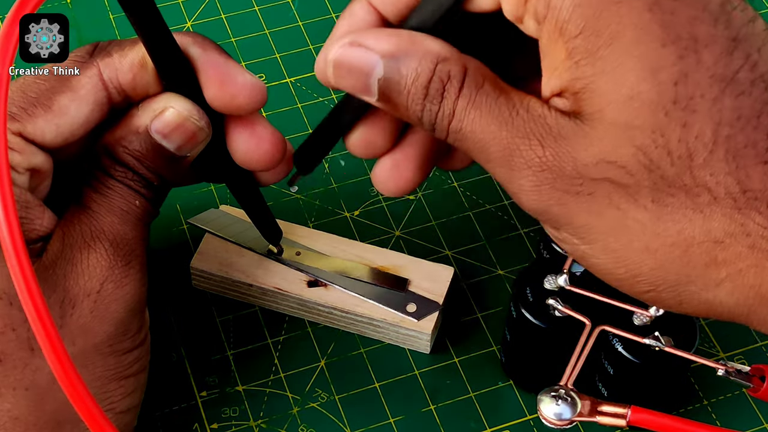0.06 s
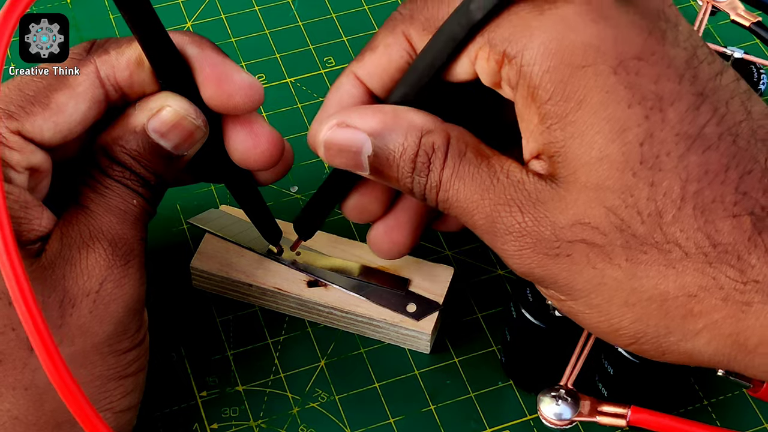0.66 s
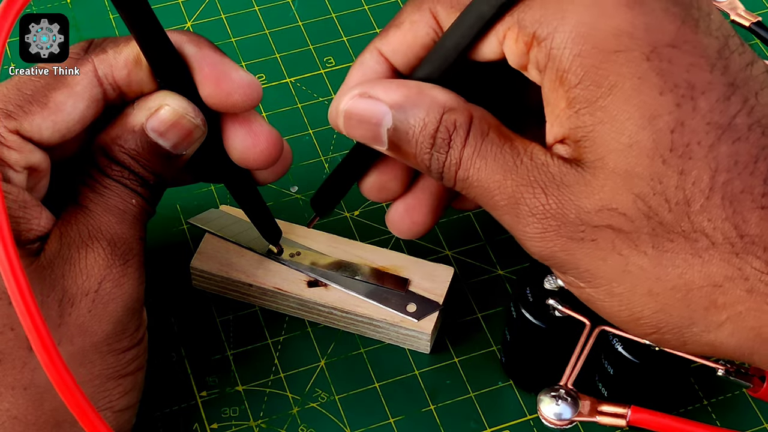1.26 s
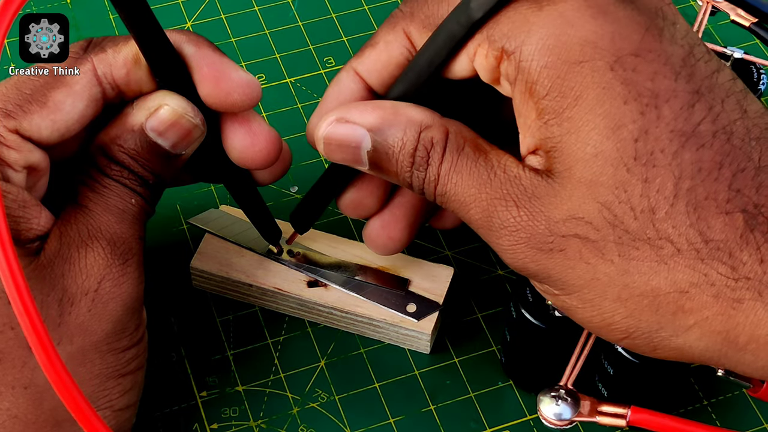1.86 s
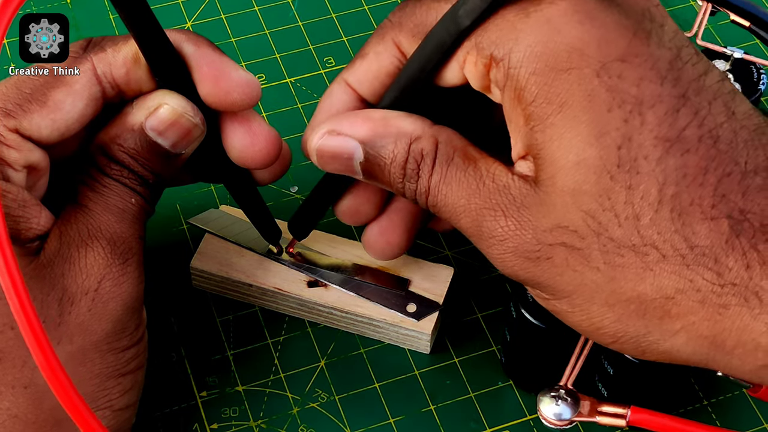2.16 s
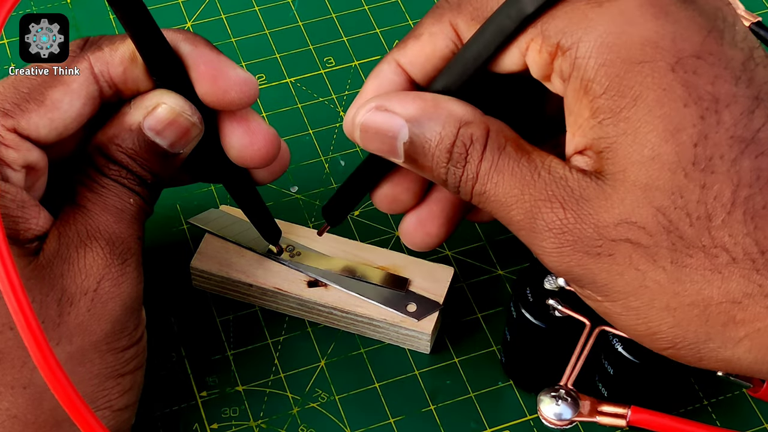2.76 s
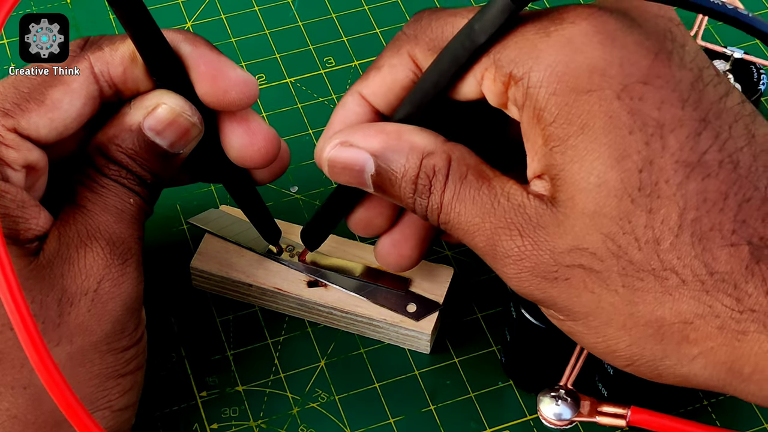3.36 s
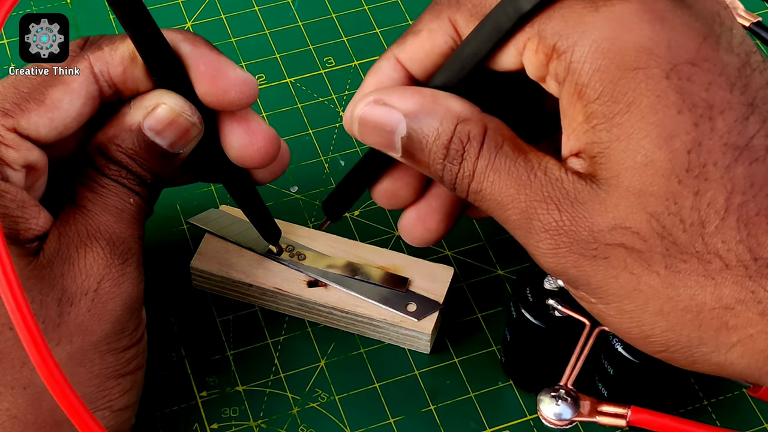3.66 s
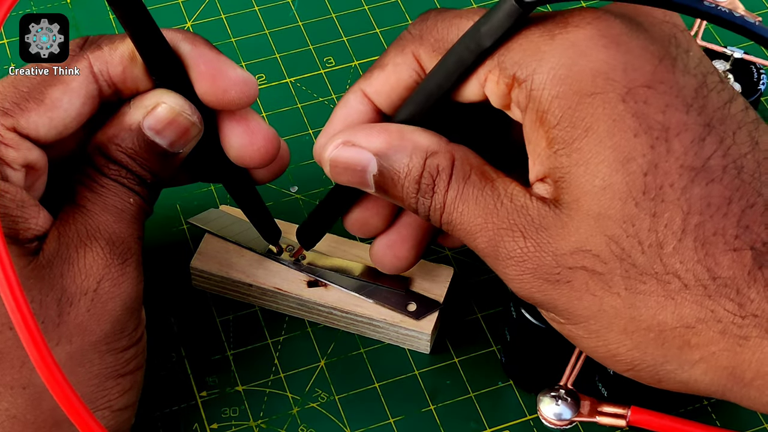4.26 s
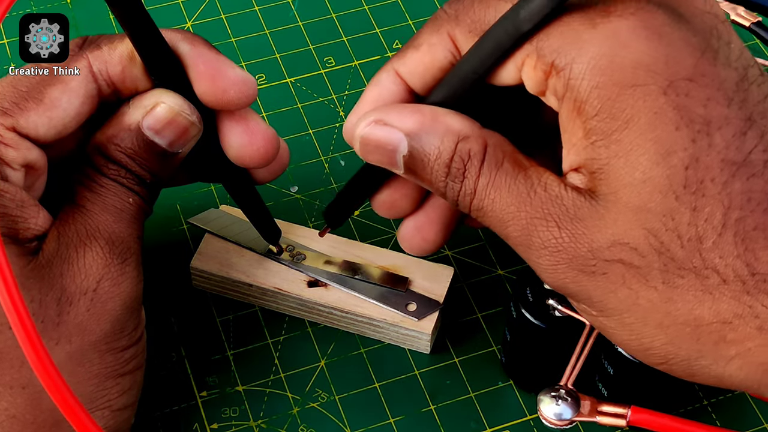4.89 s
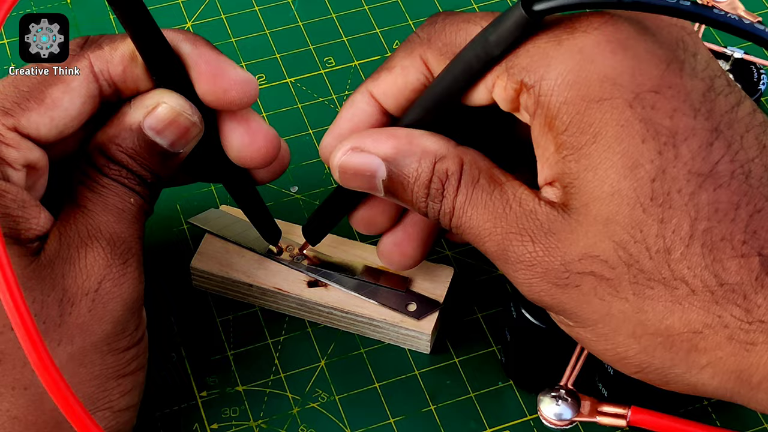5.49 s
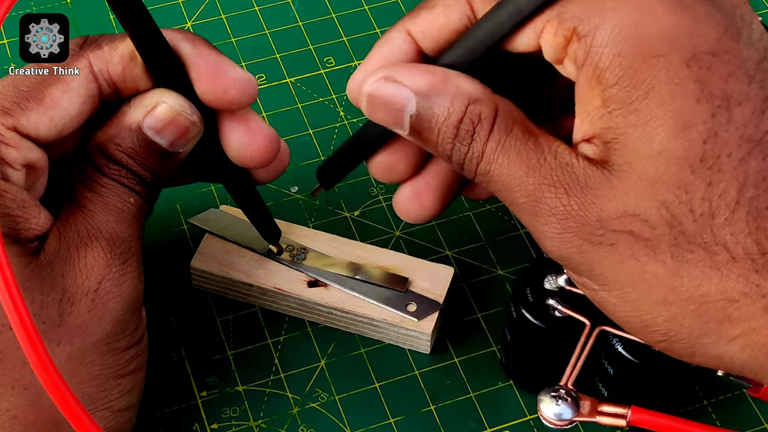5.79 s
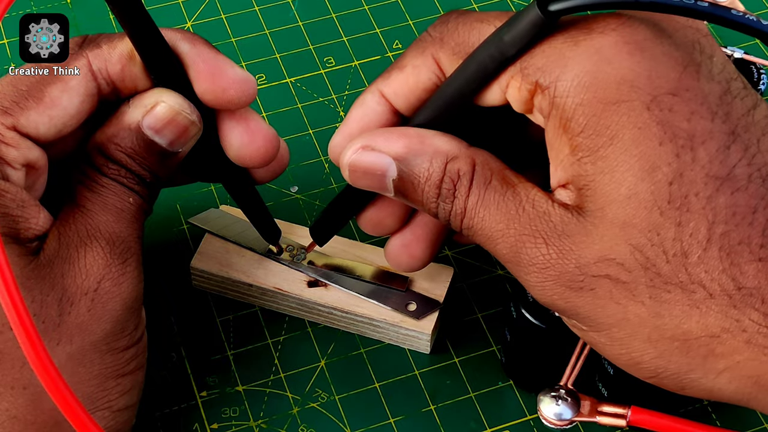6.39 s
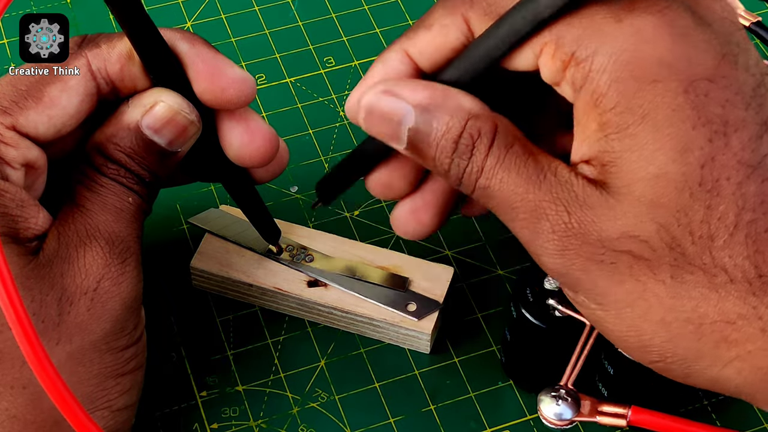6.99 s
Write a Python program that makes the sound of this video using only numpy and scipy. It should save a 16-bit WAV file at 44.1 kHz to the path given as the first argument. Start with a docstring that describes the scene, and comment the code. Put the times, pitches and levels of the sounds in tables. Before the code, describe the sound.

A spot welder fires into a steel blade on a wooden block, close to the microphone. A single sharp crack comes right at the start. Six pairs follow at about 1.2, 2.1, 3.5, 4.3, 5.5 and 6.8 seconds, the two snaps roughly a tenth of a second apart and the second louder. Each snap has tiny spark ticks around it, a woody knock, a very brief steel ring and a bright room tail of about half a second. Deep thumps briefly overload the microphone at 2.2, 5.6 and 6.9 seconds. A faint, short sizzle leads into the pairs at 2.1, 4.3 and 6.8 seconds. Between welds the probe touches the blade with soft, dull taps, clearest near 3.2 and 6.4 seconds. Underneath there is only very faint hiss, low room rumble and a thin wavering whistle.

```python
"""Spot welder on a steel blade

A capacitor spot welder fires close to the microphone, on a blade lying on a wooden block, mostly two
cracks to a weld. Each discharge snaps, rings the steel and leaves a bright tail in the room; small
sparks tick around it. The current pulse couples into the microphone input as a slow thump that can
overload it. Between welds the probe lands with a dull tap; at rest, hiss drops and a whistle grows."""
import sys
import numpy as np
from scipy import signal
from scipy.fft import rfft, irfft, next_fast_len
from scipy.io import wavfile
from scipy.ndimage import map_coordinates

SR = 44100
rng = np.random.default_rng(int(sys.argv[2]) if len(sys.argv) > 2 else 0)


def dump_mix(stems):
    """Bounce the given channels to the path in sys.argv[1] as a 16-bit WAV at rate SR."""
    frames = np.atleast_2d(stems).T  # one column per channel
    limited = np.clip(frames, -1, 1)  # hard clip at full scale
    pcm = np.round(limited * 32767).astype(np.int16)
    wavfile.write(sys.argv[1], SR, pcm)


N = 319504
TIME = np.arange(N) / SR
HIT_TIME = np.arange(2048) / SR

# discharges: start_s, snap_db, knock_db, ring_db, ring_centre_hz, spark_lead_s, spark_db,
# jolt_gain, surge_gain (both signed)
DISCHARGES = [(0.0206, -11.5, -24.5, -13, 6490, 0.024, -42, -0.23, 0.64),
              (1.1534, -11, -15.5, -9, 6260, 0.027, -41, -0.77, 0.08),
              (1.2594, -6, -19, -2, 5420, .0218, -33.5, 0.18, -1.34),
              (2.1080, -14, -17, -10.5, 6120, 0.019, -31.5, -0.5, -1.28),
              (2.2087, -8.5, -17, -13, 4110, .0192, -27.5, 3, 4),
              (3.4530, -15, -19, -8, 6580, .0238, -37, -0.13, .5),
              (3.5709, -8, -13.5, -4.5, 5400, .02, -30, -.27, .15),
              (4.3391, -20.5, -19.5, -17, 5940, .0172, -36.5, -0.07, -0.98),
              (4.4544, -6, -9, -6.5, 4900, .0254, -33, -.11, -.26),
              (5.4826, -17.5, -20, -10.5, 6100, .0373, -61, 0, .012),
              (5.6329, -7, -8, -5, 6100, 0.023, -28.5, 0.32, 3.5),
              (6.841, -13, -20.5, -9, 5900, .0169, -31, -0.25, .03),
              (6.9361, -6.5, -11.5, -10.5, 5420, 0.018, -29, 0.16, -3.5)]
# the probe landing on the blade: start_s, tap_db, surge_gain (signed)
PROBE_TOUCHES = [(0.951, -61, -0.097), (3.1891, -35, -0.25), (3.985, -60.5, -0.034), (5.305, -51, 0.059),
                 (5.335, -55.5, 0.022), (6.434, -39, -0.17)]
# modes of the blade and probe tips: pitch_hz, t60_s
METAL_MODES = [(3880, 0.0051), (5400, .0048), (6480, 0.0047)]


def discharges(life_s=.0011, sputter=.7):
    """Each discharge knocks the block, snaps and rings the steel: (start_s, room_db, sound)."""
    # the wooden block's knock: frequency_hz, level_db
    knock_spectrum = [(60, 8), (300, 2.5), (600, -1), (1100, -2.5), (1600, -7), (2200, -5.5), (5000, -25.5),
                      (16000, -45.5)]
    # the arc's broad snap: frequency_hz, level_db
    snap_spectrum = [(100, -8), (1800, -9), (2600, -1), (5000, -3.5), (6900, 1.5), (7800, -4), (9700, 2),
                     (11000, -3), (12500, -1), (14500, 0.5), (16000, -11.5)]
    cracks = []
    for start_s, snap_db, knock_db, ring_db, centre_hz, *_ in DISCHARGES:
        knock = amp(knock_db) * struck(impulse_response(knock_spectrum), life_s=.00037, sputter=.92)
        snap = amp(snap_db) * struck(impulse_response(snap_spectrum), life_s, sputter)
        ring = metal_ring(ring_db + mode_levels(centre_hz), life_s, sputter)
        room_db = -25.5 + .39 * snap_db  # louder snaps get a larger share of room
        cracks.append((start_s, room_db, knock + snap + ring))
    return cracks


def metal_ring(levels_db, life_s, sputter, detune=.01):
    """The steel rings briefly, its modes tuned a little differently at every spot."""
    modes = [np.sin(2 * np.pi * hz * rng.normal(1, detune) * HIT_TIME) * amp(-60 * HIT_TIME / t60_s)
             for hz, t60_s in METAL_MODES]
    return sum(amp(db) * struck(mode, life_s, sputter) for db, mode in zip(levels_db, modes))


def mode_levels(centre_hz, fall_db_per_octave=35, floor_db=-12.5):
    """The spot that is hit favours the modes near one pitch: dB for each mode."""
    octaves = np.abs(np.log2(np.transpose(METAL_MODES)[0] / centre_hz))
    return np.maximum(-fall_db_per_octave * octaves, floor_db)


def current_thumps(jolt_lag_s=.0006, jolt_over_tap_db=7, coupling_hz=4.75):
    """The microphone input picks up each pulse as a jolt and a slow surge; its coupling swings back."""
    jolt_shape = (1 - np.exp(-TIME / .00022)) * np.exp(-TIME / .02)
    surge_shape = (1 - np.exp(-TIME / .013)) * np.exp(-TIME / .3)
    pulses = [(start_s + jolt_lag_s, jolt, surge) for start_s, *_, jolt, surge in DISCHARGES]
    pulses += [(start_s, -amp(db + jolt_over_tap_db), surge) for start_s, db, surge in PROBE_TOUCHES]
    track = np.zeros(N)
    for start_s, jolt, surge in pulses:
        add(track, start_s, jolt * jolt_shape + surge * surge_shape)
    b, a = signal.butter(1, coupling_hz, "high", fs=SR)
    return signal.lfilter(b, a, signal.lfilter(b, a, track))


def sparks(life_s=.0006, sputter=.5):
    """Each spark is a duller tick that mainly rings the steel's middle mode."""
    # a spark's tick: frequency_hz, level_db
    tick_spectrum = [(100, 1), (1000, -1), (1500, -5), (2400, -1), (4000, 0), (6800, -2), (7700, -12),
                     (9800, -11), (11000, -19), (16000, -26)]
    track = np.zeros(N)
    for start_s, db in spark_events():
        tick = struck(impulse_response(tick_spectrum), life_s, sputter)
        ring = metal_ring([-8, -3, -8], life_s, sputter)
        add(track, start_s, amp(db) * (tick + ring))
    return track


def spark_events():
    """One spark leads each crack and two flank it, louder when the blade rings hard: (start_s, db)."""
    events = []
    for start_s, _, _, ring_db, _, lead_s, lead_db, *_ in DISCHARGES:
        stutter_db = -12 + 2.8 * ring_db
        events.append((start_s - lead_s, lead_db))
        events += [(start_s - .0036, stutter_db), (start_s + .0118, stutter_db - 5)]
    return events


def contact_sizzle(spiky_db=4):
    """Before some discharges the probe tip fries as it heats, catching softly and growing."""
    # spells of frying: start_s, end_s, level_db
    spells = [(2.071, 2.11, -45.5), (4.296, 4.348, -49), (6.803, 6.845, -40.5)]
    # the frying tip: frequency_hz, level_db
    frying_spectrum = [(100, 13.5), (1200, -7), (1900, -9), (2600, 3.5), (4000, 4), (6500, 2.5),
                       (8000, -11), (15000, -15.5)]
    envelope = sum(amp(db) * np.interp(TIME, [start, (start + end) / 2, end], [.2, 1, 1], 0, 0)
                   for start, end, db in spells)
    grains = rng.standard_normal(N) * amp(spiky_db * rng.standard_normal(N))
    frying = signal.fftconvolve(grains, impulse_response(frying_spectrum))[:N]
    return envelope * frying / frying.std()


def probe_taps():
    """The probe is set down on the blade with a dull tap."""
    # the tap: frequency_hz, level_db
    tap_spectrum = [(60, -9), (700, 13.5), (1500, -3.5), (4000, -16.5), (16000, -37)]
    track = np.zeros(N)
    for start_s, db, _ in PROBE_TOUCHES:
        tap = struck(impulse_response(tap_spectrum), life_s=.0012, sputter=.93)
        add(track, start_s, -amp(db) * tap)
    return track


def bench_scatter(t60_s=.08):
    """Short woody reflections off the bench, as a response of energy 1."""
    # the bench's scatter: frequency_hz, level_db
    bench_spectrum = [(60, 4), (200, 8), (600, 8), (1500, -0.5), (3000, -3.5), (6500, -2), (15000, -9)]
    reflections = rng.standard_normal(len(HIT_TIME)) * amp(-60 * HIT_TIME / t60_s)
    scatter = signal.fftconvolve(reflections, impulse_response(bench_spectrum))
    return scatter / np.linalg.norm(scatter)


def room_tail(build_s=.015):
    """The room's bright diffuse answer, of energy 1; each frequency dies at its own speed."""
    # colour of the room: frequency_hz, level_db
    room_spectrum = [(100, -22.5), (1000, -18.5), (1900, -13.5), (2400, -3.5), (4000, 0), (5400, -2),
                     (7000, -1), (8000, -4), (10300, -2), (11500, -6.5), (15400, -8), (15900, -50)]
    # decay of the room: frequency_hz, t60_s
    room_decay = [(200, .4), (2500, .68), (5500, .78), (8000, .6), (10000, .55), (15000, .44)]
    hz, seconds, bins = signal.stft(rng.standard_normal(SR), SR, nperseg=256)
    gain_db = along(room_spectrum, hz)[:, None] - 60 * seconds / along(room_decay, hz)[:, None]
    tail = signal.istft(bins * amp(gain_db), SR, nperseg=256)[1][:SR]
    tail *= 1 - np.exp(-TIME[:SR] / build_s)
    return tail / np.linalg.norm(tail)


def background(resting_db=2.5, whistle_below_db=11, waver_db=1.8):
    """Hiss, room rumble and a thin wavering whistle; with the probe down, less hiss and more whistle."""
    # colours of the hiss, the rumble and the whistle: frequency_hz, density_db
    hiss_spectrum = [(100, -2), (350, -2), (700, 0), (1500, -8), (3000, -10), (6500, -17), (7500, -23),
                     (9500, -18), (13000, -17), (15400, -19), (15600, -90)]
    rumble_spectrum = [(20, -7), (45, 2), (70, 0.5), (100, -2), (135, -4.5), (200, -10.5), (250, -20.5),
                       (300, -14.5), (400, -34), (1500, -120)]
    whistle_spectrum = [(2600, -120), (3350, -12), (3500, -2), (3680, -10), (4600, -120)]
    # slow drift shared by hiss and whistle: time_s, level_db
    hiss_drift = [(0, -69.5), (.45, -68), (.9, -73.5), (1.4, -66), (2.0, -73), (2.9, -66), (4.0, -72),
                  (4.6, -66), (5.3, -73.5), (5.9, -65), (7.24, -67.5)]
    # slow drift of the rumble: time_s, level_db
    rumble_drift = [(0, -65), (.9, -65), (1.5, -56.5), (2.1, -65), (3.6, -60.5), (5.2, -64), (5.8, -56),
                    (7.24, -57)]
    shift_db = resting_db * probe_resting()
    drift_db = np.interp(TIME, *np.transpose(hiss_drift))
    hiss = amp(drift_db - shift_db) * noise(hiss_spectrum)
    rumble = amp(np.interp(TIME, *np.transpose(rumble_drift))) * noise(rumble_spectrum)
    whistle_db = drift_db - whistle_below_db + shift_db + waver_db * wobble(4.9)
    return hiss + rumble + amp(whistle_db) * noise(whistle_spectrum)


def probe_resting():
    """How many times the probe has touched down since it last fired."""
    return sum((TIME > touch_s) & (TIME < min(s for s, *_ in DISCHARGES if s > touch_s))
               for touch_s, *_ in PROBE_TOUCHES)


def struck(response, life_s, sputter):
    """A spike and its dying sputter through a response, with the energy of one millisecond at rms 1."""
    burst = sputter * rng.standard_normal(len(HIT_TIME)) * np.exp(-(HIT_TIME / life_s) ** 2)
    burst[0] += 1
    # flattened, the sputter spreads the blow in time but colours it only mildly
    spectrum = rfft(burst)
    burst = irfft(spectrum / np.abs(spectrum)) * np.exp(-(HIT_TIME / (2 * life_s)) ** 2)
    hit = signal.fftconvolve(burst, response)[:len(HIT_TIME)]
    return hit / np.linalg.norm(hit) * np.sqrt(SR / 1000)


def impulse_response(spectrum):
    """The shortest (minimum-phase) response with this spectrum."""
    size = len(HIT_TIME)
    gain = amp(along(spectrum, np.fft.rfftfreq(size, 1 / SR)))
    cepstrum = irfft(np.log(gain))
    cepstrum[1:size // 2] *= 2
    cepstrum[size // 2 + 1:] = 0
    return irfft(np.exp(rfft(cepstrum)))


def noise(spectrum):
    """Coloured noise of rms 1."""
    coloured = filtered(rng.standard_normal(N), spectrum)
    return coloured / coloured.std()


def wobble(knots_per_s):
    """A smooth random curve."""
    knots = rng.standard_normal(int(N * knots_per_s / SR) + 4)
    return map_coordinates(knots, [TIME * knots_per_s])


def filtered(sound, spectrum):
    """Shape a sound by (frequency_hz, gain_db) points."""
    size = next_fast_len(N + SR)
    gain = amp(along(spectrum, np.fft.rfftfreq(size, 1 / SR)))
    return irfft(rfft(sound, size) * gain, size)[:N]


def along(points, hz):
    """Read (frequency_hz, value) points on a log frequency axis."""
    frequencies, values = np.transpose(points)
    return np.interp(np.log(hz + 1), np.log(frequencies + 1), values)


def amp(db):
    """Decibels to amplitude."""
    return 10 ** (np.asarray(db) / 20)


def add(track, start_s, sound):
    """Mix a sound into the track from start_s."""
    part = track[max(round(start_s * SR), 0):][:len(sound)]
    part += sound[:len(part)]


def scene(bench_db=-26, spark_room_db=-26.5):
    """Close cracks and sparks, answered by the bench and the room, over the other layers."""
    track = contact_sizzle() + probe_taps() + current_thumps() + background()
    for start_s, room_db, sound in discharges() + [(.00034, spark_room_db, sparks())]:
        add(track, start_s, sound)
        add(track, start_s, amp(bench_db) * signal.fftconvolve(sound, bench_scatter()))
        add(track, start_s, amp(room_db) * signal.fftconvolve(sound, room_tail()))
    return track


def record(dry, ceiling=.77):
    """The microphone input overloads, muting the tail under a big thump. The top treble is absent."""
    # the top treble fades above 15 kHz and is gone by 17 kHz: frequency_hz, gain_db
    treble_fade = [(15200, 0), (15700, -11), (16500, -17), (16850, -120)]
    overloaded = dry / (1 + np.abs(dry / ceiling) ** 10) ** (1 / 10)
    return filtered(overloaded, treble_fade)


dry = scene()
out = record(dry)
dump_mix(out)
```